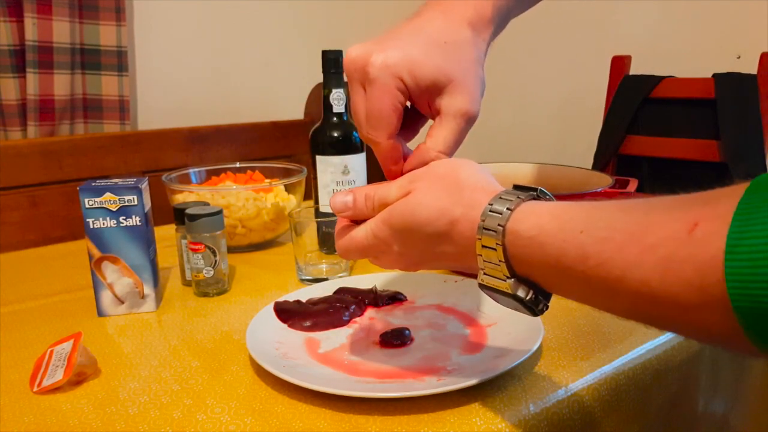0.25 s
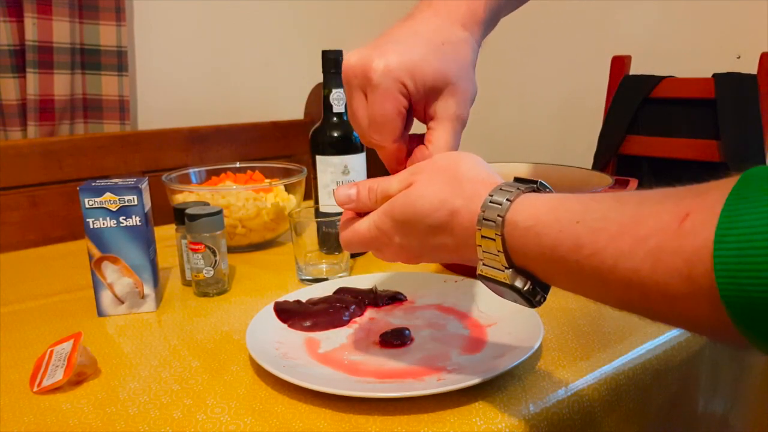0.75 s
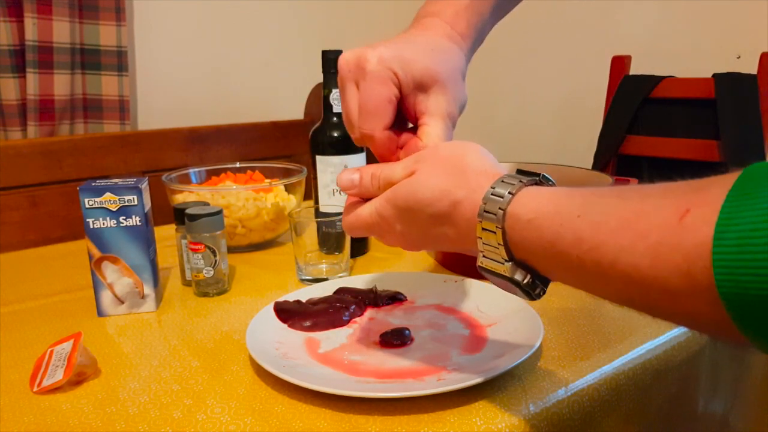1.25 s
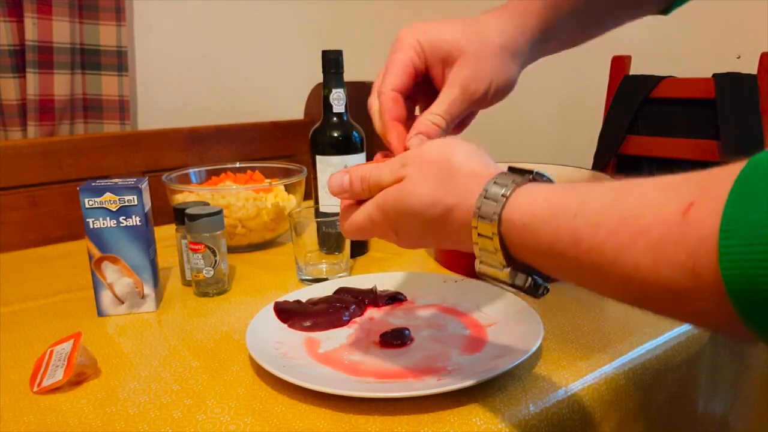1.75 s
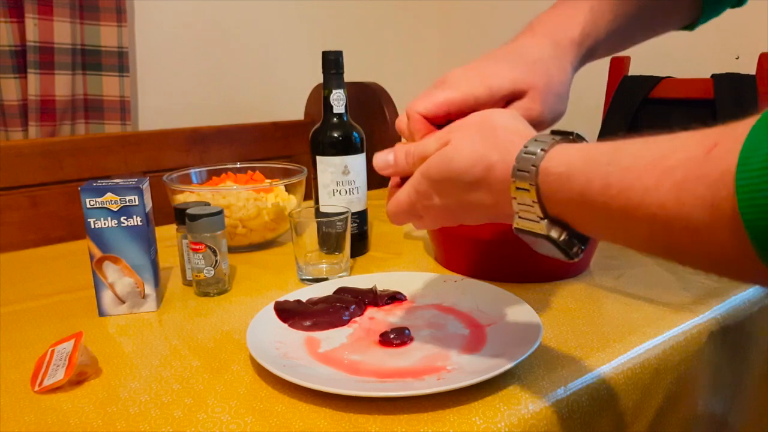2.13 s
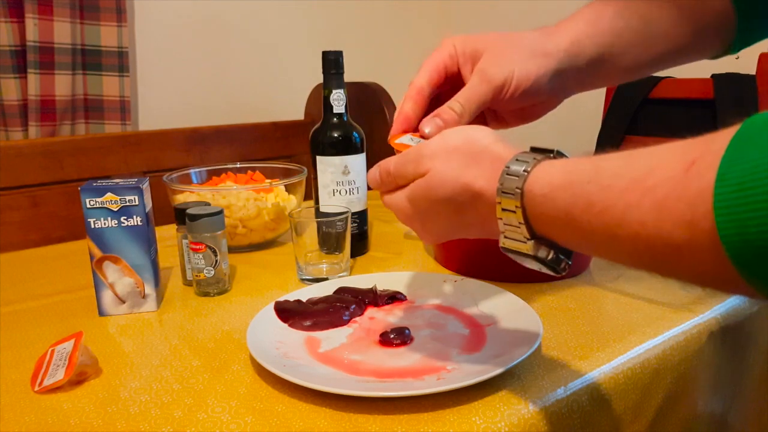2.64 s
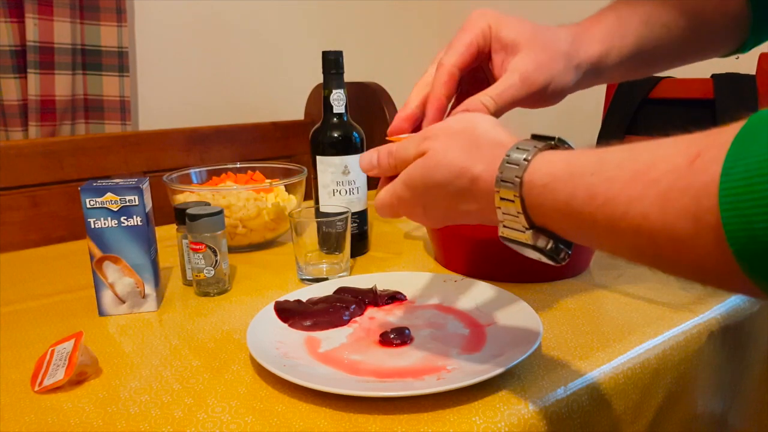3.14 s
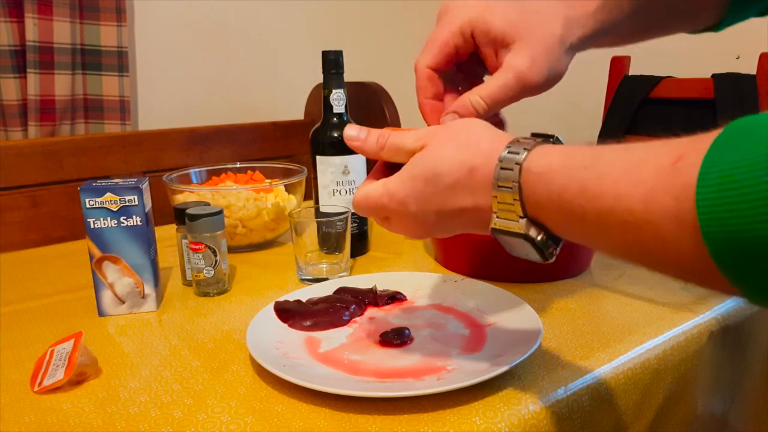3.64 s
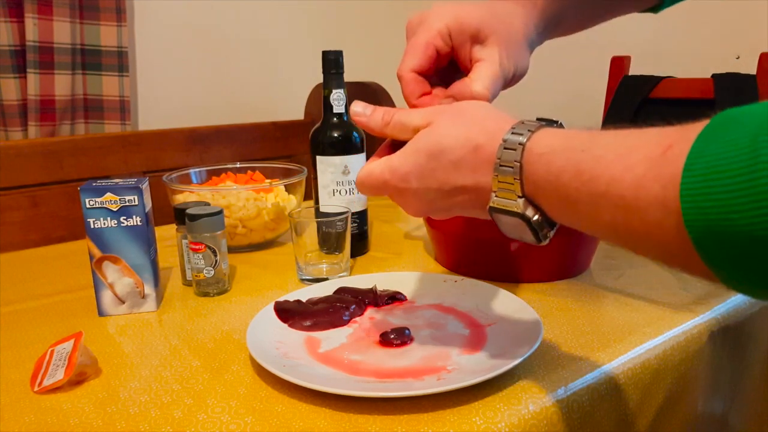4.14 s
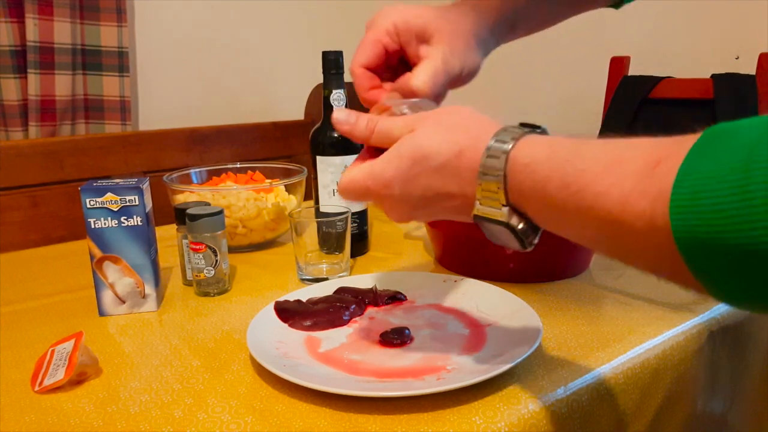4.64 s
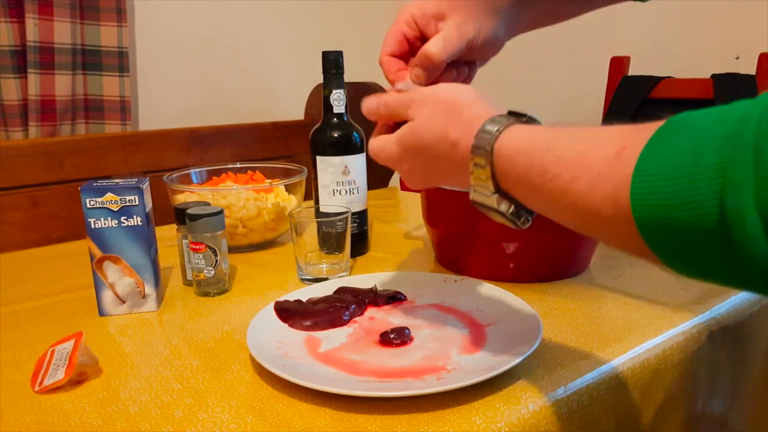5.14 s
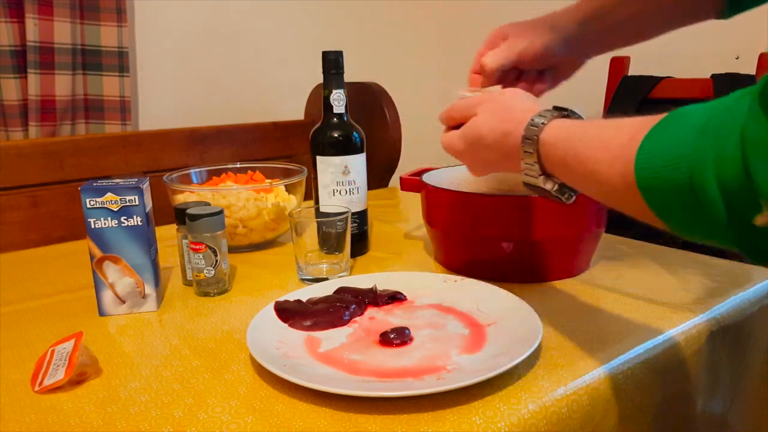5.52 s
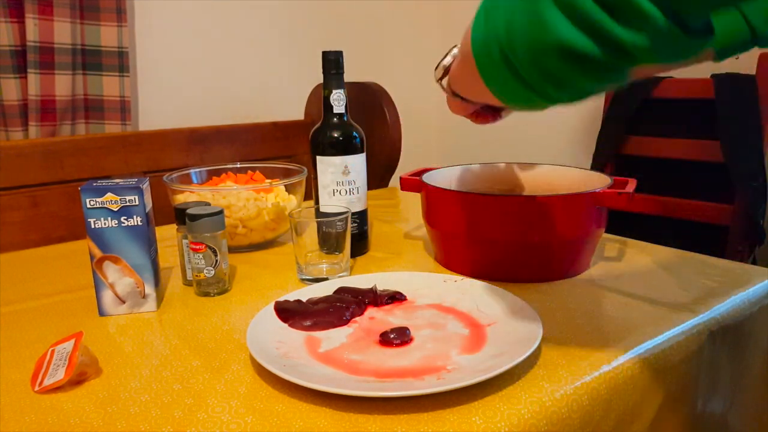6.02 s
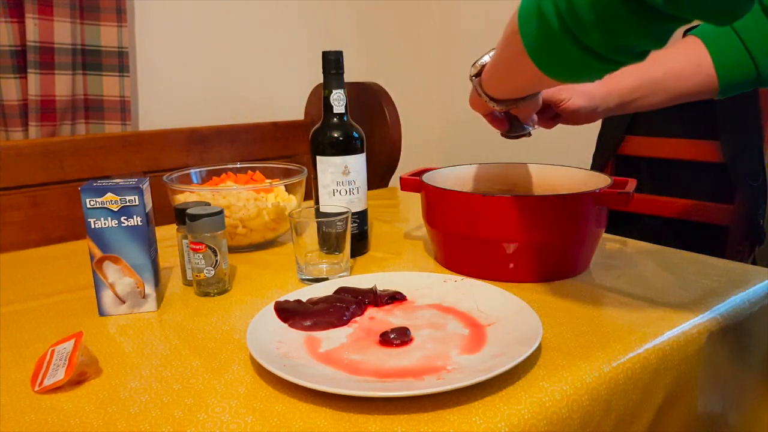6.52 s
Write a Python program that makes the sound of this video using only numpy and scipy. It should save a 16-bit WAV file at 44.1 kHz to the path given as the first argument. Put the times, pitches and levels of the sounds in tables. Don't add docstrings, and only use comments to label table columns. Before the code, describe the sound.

A quiet small kitchen, heard by a stereo camera microphone a metre off: low ventilation rumble, wavering fridge hum with a faint thin whine, soft hiss throughout. From about 0.35 s fingers press a small foil-wrapped cube, giving a few dull, hollow pops and light rustle to 0.6 s. More small clicks come at 1.1-1.8 s, with a soft table knock near 1.9. A dense crunchy cluster bursts at 2.0-2.5 s with faint deep thuds; another tap at 2.7 leads into the busiest crinkling, 2.8-3.5 s. It thins to scattered ticks by 4.5. At 4.64 s the seal tears: a very brief, bright, loud snap with a small jolt and short room tail. Brighter, crisper foil crackles follow at 4.8-5.3, a sizzling cluster with hard taps at 5.35-5.6, then sparse faint ticks until 6.6, leaving hum.

```python
import sys
import numpy as np
from scipy import signal
from scipy.fft import rfft, irfft
from scipy.io import wavfile
from scipy.ndimage import uniform_filter1d, map_coordinates

SR = 44100
rng = np.random.default_rng(int(sys.argv[2]) if len(sys.argv) > 2 else 0)


def amplitude_ratio(level_db):
    exponent = np.asarray(level_db, float) / 20
    return 10 ** exponent


def bounce(signal):
    frames = np.transpose(np.atleast_2d(signal))
    limited = np.clip(frames, -1, 1)
    pcm = np.round(limited * 32767).astype(np.int16)
    wavfile.write(sys.argv[1], SR, pcm)


N = 298733


def level(x, db):
    return x * amplitude_ratio(db) / np.sqrt(np.mean(x ** 2))


def along(table, size):
    hz, value = np.transpose(table)
    return np.interp(np.log(np.fft.rfftfreq(size, 1 / SR) + 1), np.log(hz), value)


def colour(x, table):
    size = x.shape[-1]
    return irfft(rfft(x) * amplitude_ratio(along(table, size)), size)


def band(x, hz, width_hz):
    return signal.lfilter(*signal.iirpeak(hz, hz / width_hz, fs=SR), x)


def narrow_band(x, hz, width_hz):
    return band(band(x, hz, width_hz), hz, width_hz)


def grit(size, per_s, scatter_db):
    hit = rng.random(size) < per_s / SR
    sign = rng.choice([-1, 1], size)
    return hit * sign * amplitude_ratio(scatter_db * rng.exponential(size=size).clip(0, 4))


def sides(x, pan_db):
    return np.array([x * amplitude_ratio(pan_db / 2), x * amplitude_ratio(-pan_db / 2)])


def kitchen():
    # (frequency [Hz], density [dB per Hz])
    air_colour = [(15, -44), (25, -20), (60, -17), (90, -1.5), (208, -7.5), (470, -7.5), (979, -28.5),
                  (1250, -22), (2150, -29), (4100, -36), (5000, -30), (8800, -40.5), (12200, -32),
                  (16000, -36)]
    # (frequency [Hz], likeness [0-1])
    air_alike = [(60, 0.91), (300, 0.8), (640, 0.7), (1400, 0), (3000, 0)]
    # (frequency [Hz], width [Hz], level [dB])
    fridge = [(38.8, 4.1, -76.5), (102, 19, -70), (211.3, 11, -66.5), (258.3, 30, -68), (358.2, 29, -69),
              (462.4, 20, -77.5), (1230, 89, -82)]
    whine_hz, whine_db = 1229, -77.5
    alike = np.clip(along(air_alike, size=N), 0, 1)
    mid, side = rfft(colour(rng.standard_normal((2, N)), air_colour))
    mid = irfft(mid * np.sqrt(1 + alike), N)
    side = irfft(side * np.sqrt(1 - alike), N)
    air = level(np.array([mid + side, mid - side]), -58)
    hum = sum(level(narrow_band(rng.standard_normal(N), hz, width), db) for hz, width, db in fridge)
    hum = hum + level(np.sin(2 * np.pi * whine_hz * np.arange(N) / SR), whine_db)
    return (air + hum) * sides(0.91, -.7)[:, None]


def bumps():
    # (time [s], peak [dB], frequency [Hz], T60 [s])
    thuds = [
        (1.873, -42, 127, 0.18),
        (2.02, -67, 50, .3),
        (2.24, -53, 32, 0.34),
        (4.626, -40, 192, 0.11),
        (4.63, -54, 430, 0.11),
        (2.72, -44, 513, 0.05),
        (5.42, -61, 776, 0.13),
        (5.484, -52, 665, 0.15),
    ]
    t = np.arange(N) / SR
    out = np.zeros(N)
    for s, db, hz, t60 in thuds:
        age = np.clip(t - s, 0, None)
        out += amplitude_ratio(db) * np.sin(2 * np.pi * hz * age) * (1 - np.exp(-age / 0.007)) * 1000 ** (-age / t60)
    return out


def room(dry):
    # (frequency [Hz], T60 [s])
    decay = [(500, 0.36), (1500, 0.28), (2800, 0.28), (5500, 0.26), (11000, 0.23)]
    room_db, gap_s = 1.5, 0.0086
    t = np.arange(SR // 2) / SR
    places = (np.arange(N) // (SR // 9)) % 3
    octave = np.log2(np.fft.rfftfreq(len(t), 1 / SR) + 1)
    centres = np.log2([hz for hz, _ in decay])
    out = 0
    for place in range(3):
        noise = rng.standard_normal((2, len(t)))
        noise = rfft(noise + band(noise[0] * 0.16, 470, 1400))
        tail = 0
        for row, (_, t60) in zip(np.eye(len(centres)), decay):
            share = np.interp(octave, centres, row)
            tail = tail + irfft(noise * share, len(t)) * 1000 ** (-t / t60)
        tail = tail * np.clip((t - .001) / gap_s, 0, 1)
        tail = tail / np.sqrt(np.sum(tail ** 2) / 2)
        out = out + signal.fftconvolve(tail, (dry * (places == place))[None])[:, :N]
    return amplitude_ratio(room_db) * sides(1, -1.3)[:, None] * out


def echoes(dry):
    # (delay [ms], level [dB], left minus right [dB])
    bounces = [(.85, -13, 0.5), (1.401, -12.5, -0.5), (1.866, -21, -2), (2.5, -10, 5), (3.08, -11, 3.5),
               (5.904, -16.5, 6), (6.86, -9, -2), (8.007, -15.5, 8), (9, -15, -1), (10.73, -17.5, 3.5),
               (12.4, -14, 1), (13.7, -19.5, -5), (20.6, -16, -1.5)]
    soft = signal.lfilter(*signal.butter(1, 11000, fs=SR), dry)
    out = np.zeros((2, N))
    for ms, db, pan_db in bounces:
        late = int(ms * SR / 1000)
        for side, sign in enumerate((1, -1)):
            lag = late - sign * int(pan_db / 2)
            out[side] += amplitude_ratio(db + sign * pan_db / 2) * np.roll(soft, lag)
    return out


def rustle():
    # (time [s], finger pressure [dB], brightness of the rustle [dB])
    handling = [(0, -74, -20), (.45, -59, -8), (.8, -73, -6), (1.1, -77, -12), (1.27, -66, -3),
                (1.7, -66.5, -6), (2.2, -56, -4), (2.8, -68.5, -2.5), (3.18, -55, -13), (3.7, -52, -18),
                (4.3, -76, 0), (4.602, -69, -1), (5.199, -92, 15), (5.5, -58.5, 0.5), (5.9, -61, -8.5),
                (6.2, -71, 4), (6.37, -56, -8), (6.77, -102, 18)]
    # (frequency [Hz], density [dB per Hz])
    dull_colour = [(500, -30.5), (1000, -6), (1700, 0.5), (2800, -4.5), (4000, -10.5), (6000, -27)]
    bright_colour = [(2500, -28.5), (4000, -4.5), (5200, 1.5), (8500, -7), (12000, -8), (16000, -8.5)]
    s, press_db, bright_db = np.transpose(handling)
    t = np.arange(N) / SR
    dull = level(colour(grit(size=N, per_s=740, scatter_db=-2.0), dull_colour), -15.5)
    bright = level(colour(grit(size=N, per_s=130, scatter_db=-1.5), bright_colour), -8.5)
    mixed = dull + bright * amplitude_ratio(np.interp(t, s, bright_db))
    return mixed * amplitude_ratio(np.interp(t, s, press_db))


def crunches():
    # (time [s], length [s], level [dB], centre [Hz], sizzle [dB])
    squeezes = [(0.4, 0.19, -80, 3700, -88), (1.239, 0.032, -55.5, 3000, -66),
                (1.318, 0.019, -62, 2600, -60), (1.748, 0.058, -59, 3340, -59),
                (2.019, 0.06, -48, 5200, -53.5), (2.837, 0.042, -56, 1640, -50.5),
                (3.04, 0.03, -56, 3000, -79), (3.075, 0.068, -58, 4150, -57.5),
                (3.236, 0.015, -71, 4500, -35), (3.436, 0.027, -60, 2960, -91),
                (4.085, 0.047, -63, 3430, -101), (4.257, 0.021, -51, 1110, -85),
                (4.818, 0.01, -55, 3930, -35), (5.406, 0.031, -50, 4500, -43),
                (5.416, 0.058, -59.5, 1160, -82), (5.485, 0.023, -49.5, 2520, -61),
                (3.096, 0.055, -56, 3000, -80), (6.033, 0.1, -71, 6600, -82),
                (5.718, 0.019, -66, 5030, -49), (5.829, 0.076, -70, 2340, -94),
                (5.998, 0.099, -64.5, 4330, -75), (6.358, 0.012, -50, 3900, -78.5),
                (6.626, 0.048, -64, 2034, -90.5), (6.627, 0.041, -66.5, 5030, -85.5)]
    out = np.zeros(N)
    t = np.arange(SR // 4) / SR
    for s, length, db, hz, sizzle_db in squeezes:
        grains = grit(size=(2, len(t)), per_s=620, scatter_db=3.5)
        body = level(narrow_band(grains[0], hz, 0.39 * hz), db)
        sizzle = level(narrow_band(grains[1], 11000, 7400), sizzle_db)
        swell = np.clip(t / 0.032, 0, 1) * np.exp(-(t / length) ** 2)
        span = slice(int(s * SR), min(N, int(s * SR) + len(t)))
        out[span] += ((body + sizzle) * swell)[:span.stop - span.start]
    return out


def tear():
    # (time [s], level [dB], left minus right [dB])
    course = [(4.618, -71.5, 1.5), (4.623, -40.5, -6.5), (4.63, -32.5, 0.5), (4.637, -24, -0.5),
              (4.6373, -16, -2.5), (4.6392, -5.5, 0.5), (4.6404, -13, -2), (4.644, -8, 0),
              (4.6461, -12, -12), (4.647, -19, 3), (4.65, -19, 2), (4.653, -22, 5.5), (4.659, -34.5, 1),
              (4.68, -61.5, -9)]
    # (frequency [Hz], density [dB per Hz])
    tear_colour = [(240, -56.5), (400, -27), (620, -27.5), (1050, -18), (1370, -17), (1600, -18.5),
                   (1850, -11.5), (2400, -12), (2800, -5.5), (3480, -15), (3940, -9), (5380, -12.5),
                   (7230, -16), (11400, -9.5), (15000, -10.5), (15700, -19.5), (16500, -38)]
    # (frequency [Hz], width [Hz], level [dB])
    tear_ring = [(2820, 120, -10), (4200, 600, -11.5), (5524, 690, -10.5)]
    wide_db, left_lag = 0.5, 1
    opens_s, strain_hz, strain_width_hz, strain_db = 4.6345, 1620, 700, 5
    split_hz, low_pan_db, high_pan_db = 4600, -2, 5.5
    s, db, pan_db = (np.array(column) for column in zip(*course))
    t = np.arange(N) / SR
    shared, own = (grit(size=(count, N), per_s=24000, scatter_db=-4.5) for count in (1, 2))
    shared = np.array([np.roll(shared[0], left_lag), shared[0]])
    own_treble = own - signal.lfilter(*signal.butter(2, 6500, fs=SR), own)
    volley = shared + amplitude_ratio(wide_db) * own_treble
    volley = level(colour(volley, tear_colour), 0)
    volley = volley + sum(amplitude_ratio(gain) * level(band(volley, hz, width), 0) for hz, width, gain in tear_ring)
    strain = level(narrow_band(volley, strain_hz, strain_width_hz), strain_db)
    volley = volley + strain * (t < opens_s)
    low = signal.lfilter(*signal.butter(1, split_hz, fs=SR), volley)
    high = volley - low
    volley = low * sides(0.96, low_pan_db)[:, None] + high * sides(1, high_pan_db)[:, None]
    volley = volley / uniform_filter1d(np.mean(volley ** 2, axis=0), size=90) ** 0.4
    push_db = np.interp(t, s, db, left=-200, right=-200)
    return volley * sides(amplitude_ratio(push_db), np.interp(t, s, pan_db))


def pops():
    # (time [s], peak [dB], ring [Hz], crack re peak [dB])
    hidden = [(.3538, -39, 1230, -21), (.4075, -42, 1430, -2.5), (.5119, -38, 1430, -10.5),
              (1.1252, -53, 1880, -35), (1.3268, -41, 1680, -17), (1.2408, -38.5, 1990, -5.5),
              (1.5128, -50, 1720, 3), (4.6588, -30.5, 1360, -27), (1.9725, -49, 1630, -15),
              (2.0259, -23, 1710, -9), (3.1478, -42, 1700, -10), (2.0897, -37, 1850, -16),
              (2.1184, -36, 1620, -2.5), (2.3126, -43, 1710, -30), (2.3597, -46, 1590, -0.5),
              (2.3935, -45, 2360, -9), (2.5994, -53, 1620, -9), (2.7324, -38, 1670, -3),
              (3.083, -33.5, 3230, -4), (3.4403, -30, 2850, -10), (3.7181, -44.5, 2470, -2.5),
              (4.0916, -38, 1690, -8), (4.2353, -34.5, 1710, -12), (4.5446, -45.5, 2700, -6)]
    between_fingers = [(.5777, -40, 1730, -37), (.5933, -32.5, 1460, -63), (1.5121, -35.5, 1640, -29),
                       (1.6276, -37.5, 1680, -6), (1.8896, -54.5, 1290, -3), (2.031, -30.5, 1310, -10.5),
                       (2.0664, -29.5, 1840, -37), (2.1702, -39.5, 1710, -13), (2.2126, -35, 1660, -6),
                       (1.5725, -52, 2300, -22), (2.4569, -37.5, 1450, -5.5), (2.4997, -29, 1550, -7.5),
                       (2.8012, -42.5, 1340, -11.5), (2.8513, -32.5, 2680, -3), (2.9527, -46.5, 1220, -14),
                       (2.9984, -40, 1390, -12), (3.0252, -27, 1570, -7), (3.0498, -39.5, 1260, -1.5),
                       (3.1076, -33.5, 1510, -12), (3.1406, -28.5, 1670, -7.5), (3.1618, -36, 2240, -9.5),
                       (3.3632, -36, 1270, 0.5), (3.4491, -35, 1650, -3), (3.5098, -48, 1300, -3),
                       (3.6036, -45.5, 2400, -5), (3.8908, -48, 1360, -27), (3.9238, -38.5, 1450, -4)]
    facing = [(1.3253, -44.5, 3280, 8.5), (2.0457, -34, 1430, -5), (2.0485, -47, 1890, 3),
              (2.8505, -38, 1370, -4), (3.1425, -41, 1560, -7.5), (3.3628, -42, 2800, -49),
              (4.597, -41.5, 2800, -6), (5.4282, -56, 4500, 0), (5.462, -50, 5200, -17),
              (5.4863, -34.5, 2500, 9), (1.3213, -63, 5000, 4), (3.1839, -34, 1740, -7.5),
              (3.0503, -41, 3040, -8), (3.2662, -33.5, 1430, -17), (3.2835, -55, 1500, -21),
              (3.3068, -41.5, 1630, -4), (3.3745, -38, 1200, -4.5)]
    loose = [(4.8218, -29.5, 3500, 0), (4.8238, -29, 4000, -25.5), (4.979, -50.5, 1430, -12),
             (4.9666, -42.5, 2700, -6.5), (5.1073, -39, 2990, -5.5), (5.1746, -42.5, 4400, -16),
             (5.187, -48.5, 4970, -13), (5.249, -42.5, 2870, -26), (5.2585, -43, 2970, 0),
             (5.3717, -45.5, 5140, 3.5), (5.6975, -47, 2370, -2.5), (5.7698, -48, 2280, -3),
             (5.8192, -42, 2350, -2), (5.9938, -45, 2840, -0.5), (5.9994, -49, 4060, 9.5),
             (5.2495, -54.5, 950, -20), (6.3709, -49.5, 1480, 8), (6.6263, -50, 1985, 3)]
    # (time [s], peak [dB], ring [Hz], crack re peak [dB], sizzle re peak [dB])
    sharp = [(1.76, -31.5, 1494, -5.5, -6.5), (2.704, -45.5, 1640, -32, -13), (3.246, -24, 1690, -4, -39),
             (4.597, -32, 1696, -2.5, -15), (5.3564, -51, 5700, -16.5, 0), (5.4024, -43, 4610, -23, -6),
             (5.414, -48, 4670, 5, -12), (5.486, -40.5, 5000, -5, 14.5), (5.4872, -42, 1110, -17, -30),
             (5.5134, -38, 4100, -19, -22), (5.737, -52, 1900, 1, -16)]
    turned = [
        (5.4211, -34.5, 4200, 0, 3),
        (5.4324, -33.5, 3630, 1, -0.5),
        (5.461, -39, 4400, -13.5, -16),
        (5.59, -38, 5000, 0, -7),
    ]
    cycles, cupped_cycles = 1.3, 1.5
    crack_s, sizzle_s, crack_db, sizzle_db = 0.00016, 0.00014, 4.5, 5.5
    shade_db, faint_sizzle_db = -5.5, -35.5
    overtone, overtone_db, overtone_per_crack = 1.707, -6.5, 0.62
    dull_crack_db, dull_swell_cycles = -29, 1.1

    rows = []
    for table, screen_db in (hidden, -2), (between_fingers, 4.5), (facing, 9), (loose, 3.5):
        rows += [(*row, faint_sizzle_db, screen_db) for row in table]
    rows += [(*row, 4.5) for row in sharp]
    rows += [(*row, -3) for row in turned]

    direct, sent = np.zeros(N + 512), np.zeros(N + 512)
    t = np.arange(512) / SR
    noises = rng.standard_normal((len(rows), 2, len(t)))
    for (s, db, hz, crack, sizzle, screen_db), noise in zip(rows, noises):
        upper = np.sin(2 * np.pi * hz * overtone * t + noise[1, -1])
        upper = amplitude_ratio(overtone_db + overtone_per_crack * crack) * upper
        wave = -(np.sin(2 * np.pi * hz * t) + upper)
        swell = dull_swell_cycles * np.clip(crack / dull_crack_db, .02, 1)
        wave = wave * (1 - np.exp(-(t * hz / swell) ** 2))
        s = s - 0.74 * swell / hz
        ring = wave * np.exp(-t * hz / cycles) * (1 - np.exp(-t * hz * 4.6))
        cupped = wave * np.exp(-t * hz / cupped_cycles) * (1 - np.exp(-t * hz * 5.2))
        front = narrow_band((3.1 * (t == 0) + noise[0]) * np.exp(-t / crack_s), 5200, 3600)
        tip = narrow_band((1.1 * (t == 0) + noise[1]) * np.exp(-t / sizzle_s), 12300, 8000)
        ring = ring / abs(ring).max()
        cupped = amplitude_ratio(-2.0) * cupped / abs(cupped).max()
        front = amplitude_ratio(crack + crack_db) * front / abs(front).max()
        tip = amplitude_ratio(sizzle + sizzle_db) * tip / abs(tip).max()
        span = slice(int(s * SR), int(s * SR) + len(t))
        direct[span] += amplitude_ratio(db + screen_db) * (cupped + amplitude_ratio(shade_db) * front + tip)
        sent[span] += amplitude_ratio(db + 1.0) * (ring + front + tip)
    return signal.lfilter(*signal.butter(2, 595, "high", fs=SR), direct[:N]), sent[:N]


def ports(x):
    # (frequency [Hz], gain [dB])
    response = [(300, 3), (700, 0), (1100, -1), (1500, 0), (3500, 3), (5000, 0.5), (6500, -2), (8500, -3.5),
                (11500, 0), (16000, -0.5)]
    size = 1024
    cepstrum = irfft(np.log(amplitude_ratio(along(response, size=size))), size)
    cepstrum = cepstrum * np.r_[1, 2 * np.ones(size // 2 - 1), 1, np.zeros(size // 2 - 1)]
    impulse = irfft(np.exp(rfft(cepstrum)), size)
    return signal.fftconvolve(x, impulse[None])[:, :N]


def scene():
    # (time [s], lag [samples])
    left_path = [(0, 1.3), (5.54, 1.2), (5.68, 4.3), (6.77, 3.6)]
    direct, sent = pops()
    grains = rustle() + crunches()
    snap = tear()
    near = sides(direct + grains, -1.5)
    steps = np.arange(N)
    lag = np.interp(steps / SR, *np.transpose(left_path))
    near[0] = map_coordinates(near[0], [steps - lag], mode="mirror")
    wet = room(sent + grains + amplitude_ratio(-5) * snap[1])
    wet = wet + echoes(0.52 * direct + 0.38 * sent + grains + amplitude_ratio(-2.5) * snap[1])
    return ports(near + snap + wet) + kitchen() + bumps()


def band_limit(x):
    return signal.sosfilt(signal.butter(12, 16790, fs=SR, output="sos"), x)


def record(dry):
    rounded = np.tanh(1.122 * dry) / 1.277
    top = signal.ellip(8, .2, 40, 16100, fs=SR, output="sos")
    return band_limit(signal.sosfilt(top, rounded))


dry = scene()
out = record(dry)
bounce(out)
```